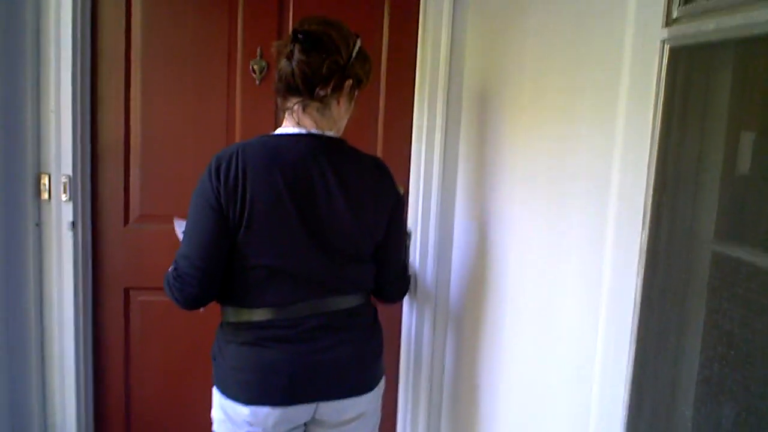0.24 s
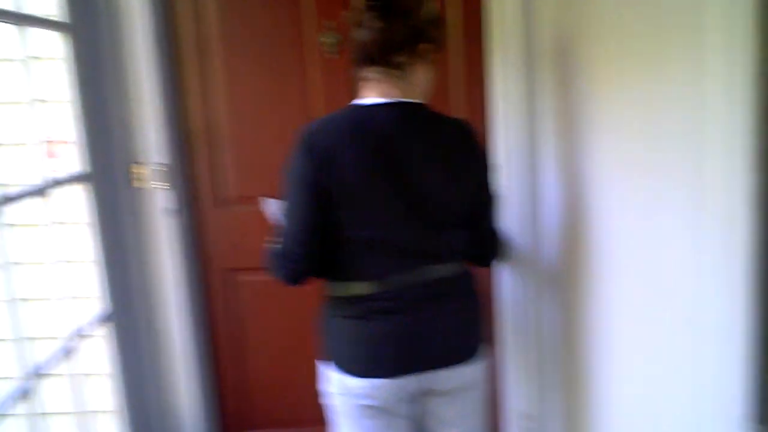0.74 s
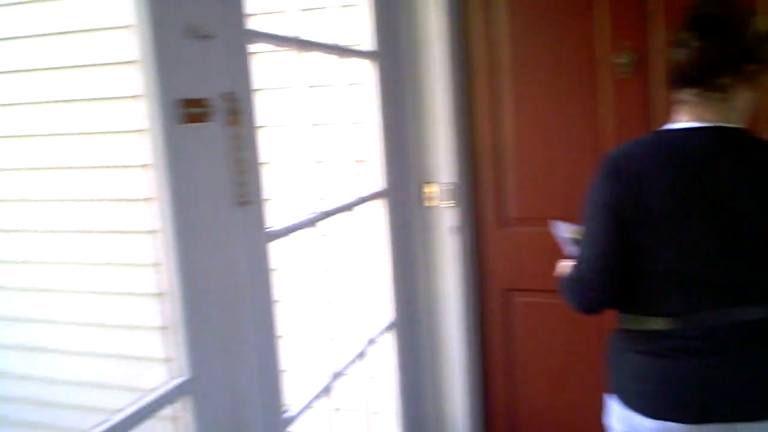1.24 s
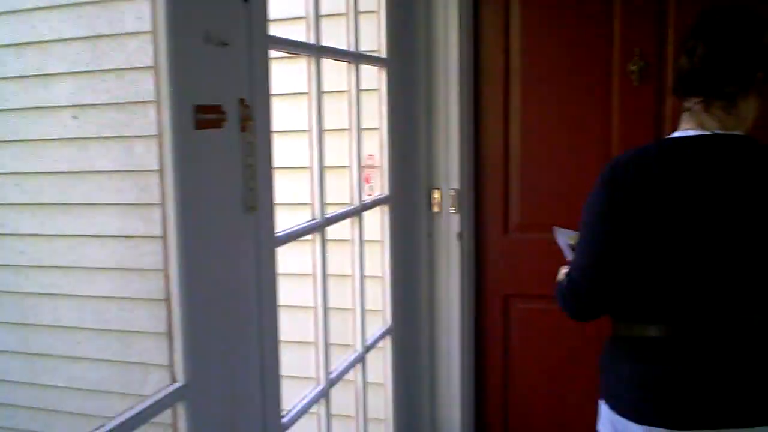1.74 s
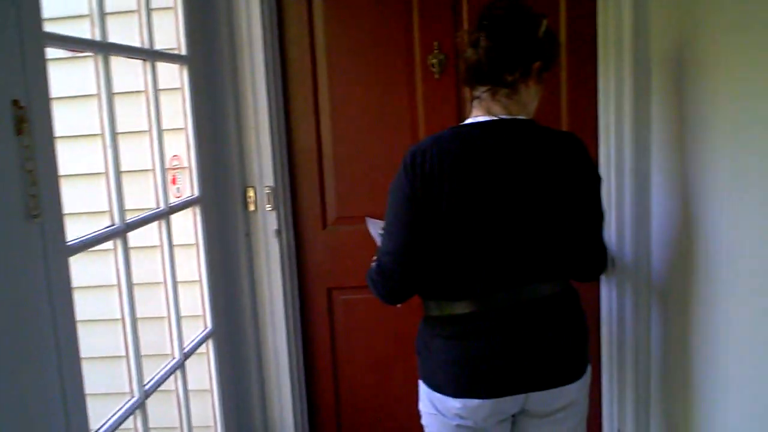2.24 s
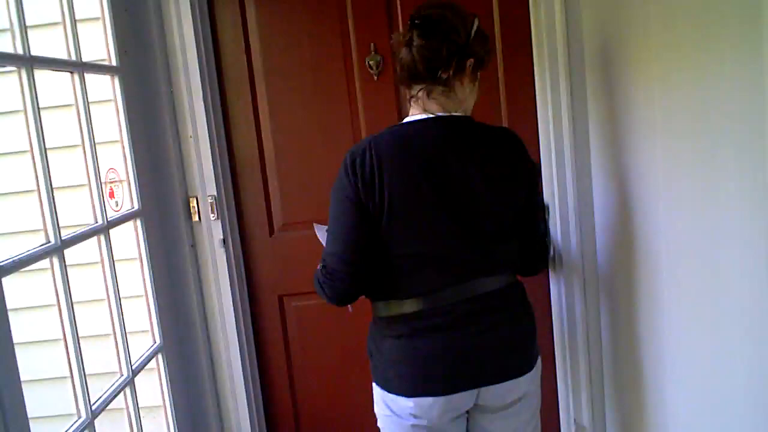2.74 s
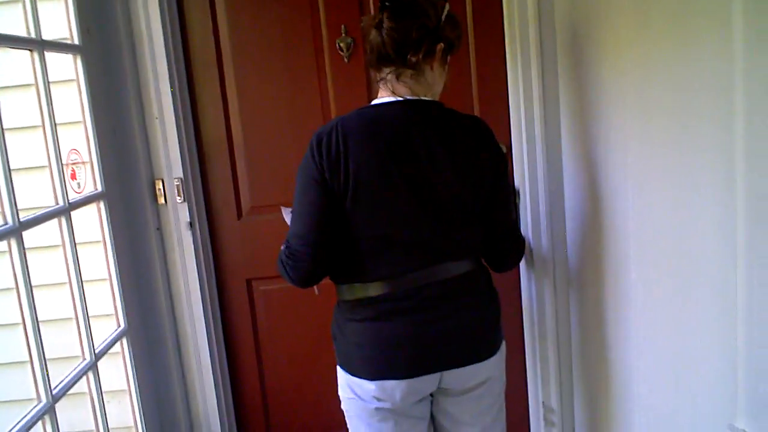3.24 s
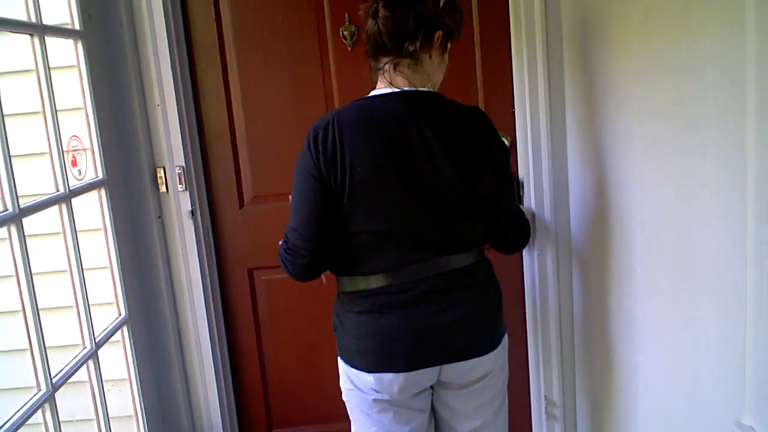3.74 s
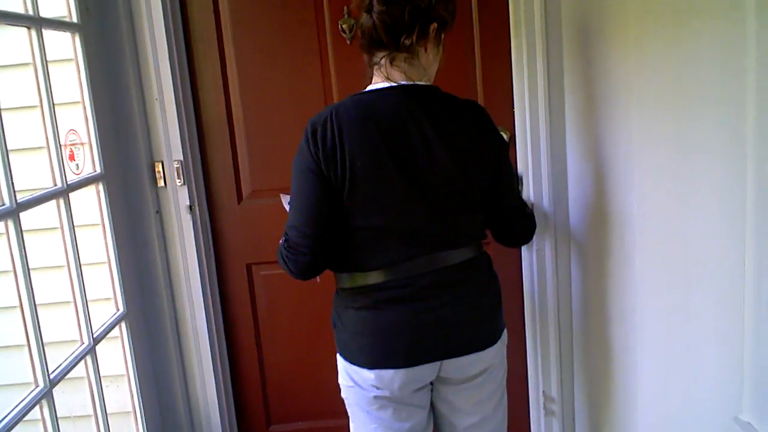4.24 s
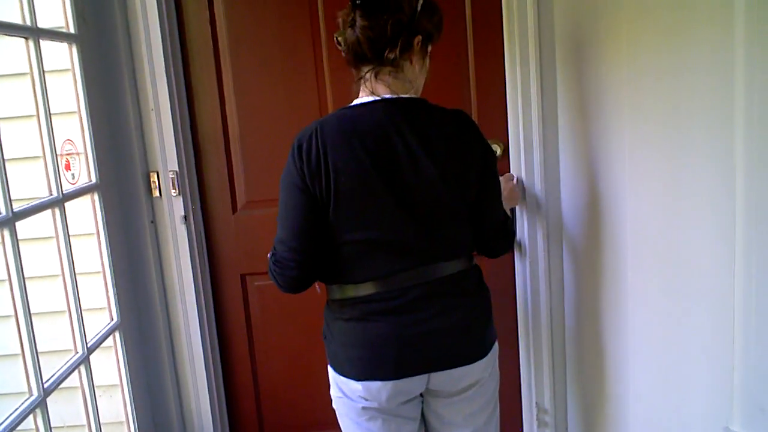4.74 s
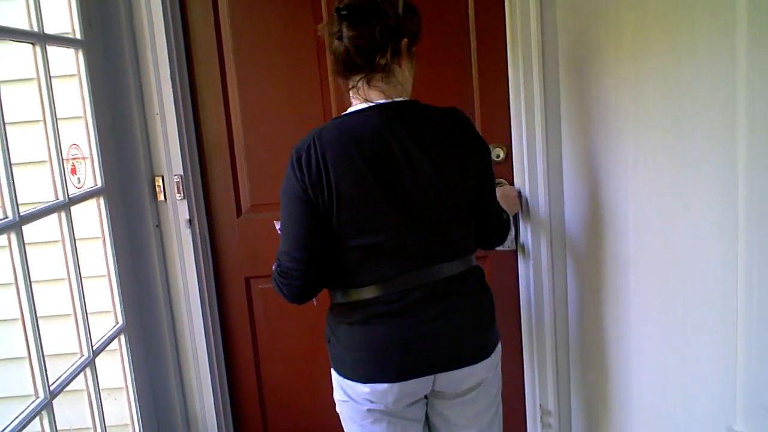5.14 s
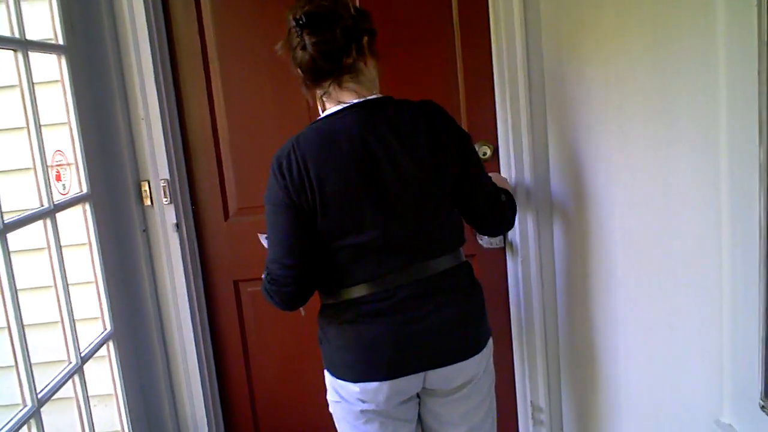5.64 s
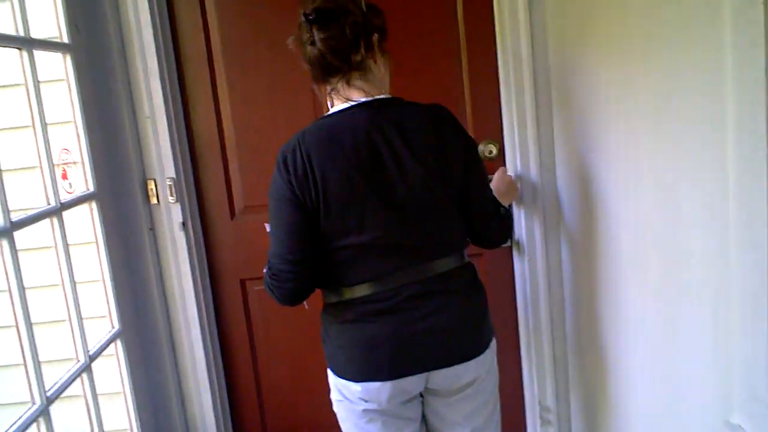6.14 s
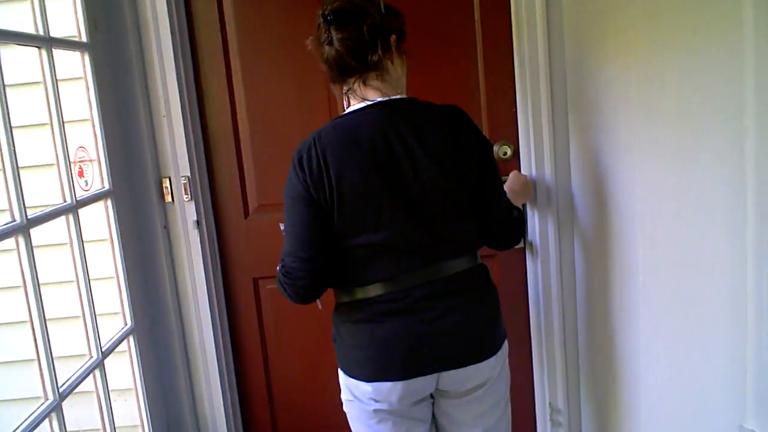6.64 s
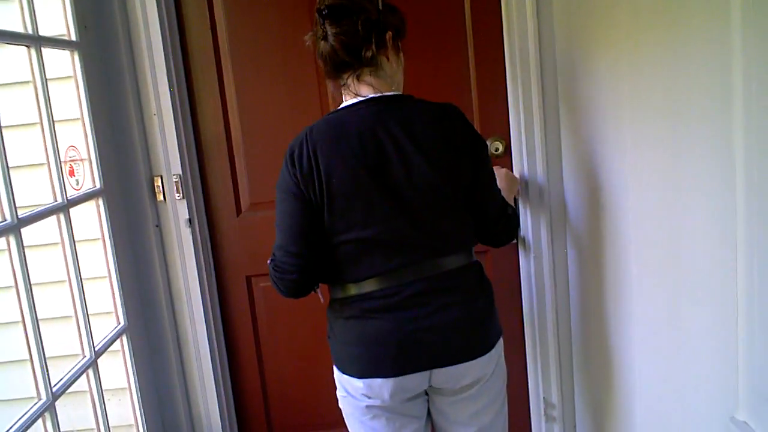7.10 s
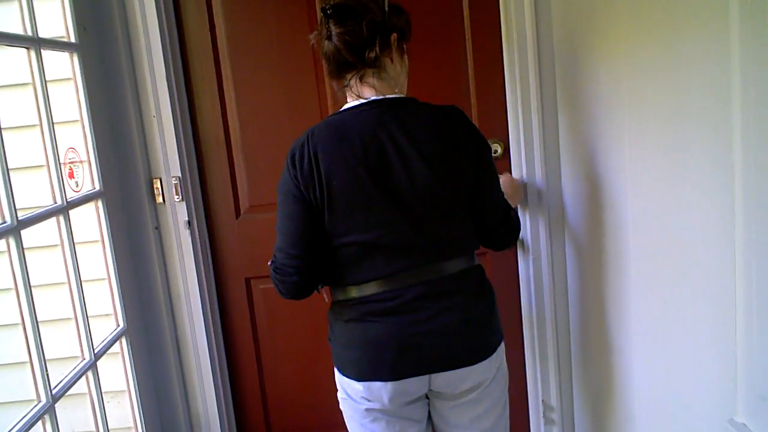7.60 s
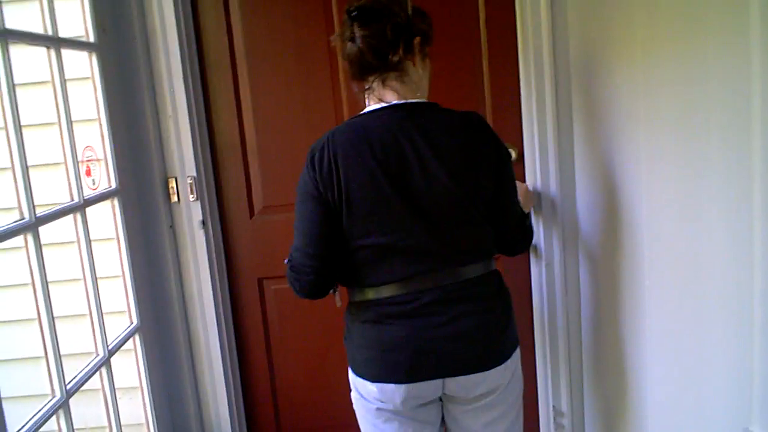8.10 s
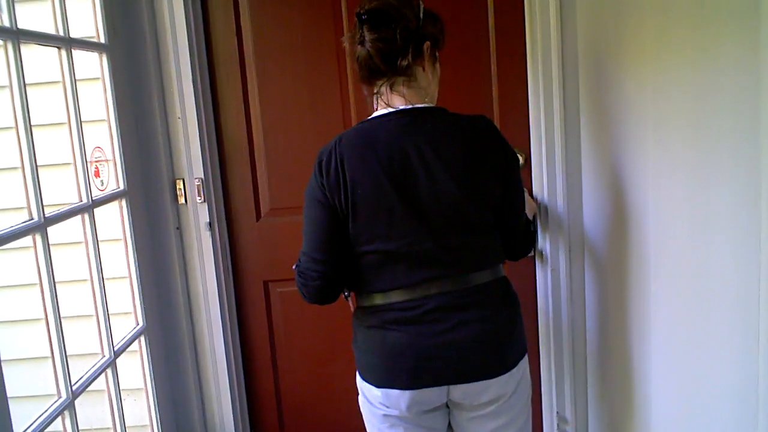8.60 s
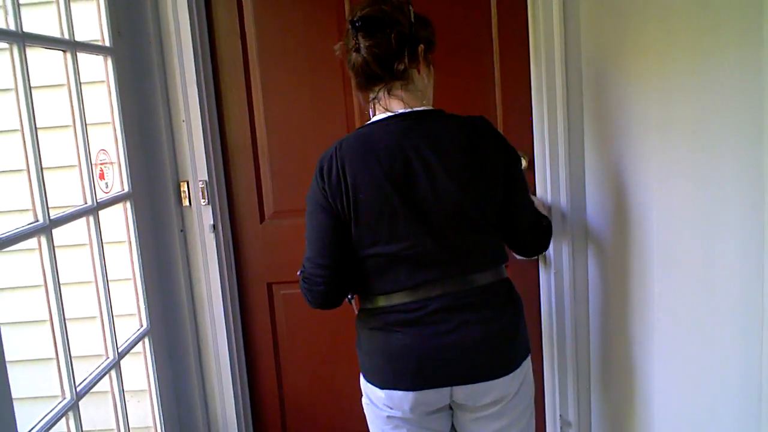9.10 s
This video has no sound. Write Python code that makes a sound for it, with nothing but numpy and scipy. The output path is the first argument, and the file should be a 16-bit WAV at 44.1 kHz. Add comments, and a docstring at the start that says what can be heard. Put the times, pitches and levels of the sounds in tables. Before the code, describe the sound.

Paper crinkles and keys jingle at a house door, a storm door latches with a sharp double knock, then a key clicks into a lock and the knob rattles.

```python
"""At a house door in a small hard-walled entry: paper crinkles, keys jingle and shoes shift under faint outdoor air.
A storm door hisses on its closer, paper swishes, the door squeaks and latches with a sharp double knock.
A key taps the lock face, scrapes past the pins and seats; the knob is turned, the door bumps and hanging keys tinkle.
Blows are noise clicks, rubbing is noise under a level curve; each is filtered by its object, then by the entry."""
import sys
import numpy as np
from scipy import signal
from scipy.fft import rfft, irfft
from scipy.io import wavfile
from scipy.ndimage import uniform_filter1d

SR = 44100
rng = np.random.default_rng(int(sys.argv[2]) if len(sys.argv) > 2 else 0)


def wrap_up_sound(samples):
    """Save the sound to the file named by the first command line argument, as 16-bit audio."""
    columns = np.atleast_2d(samples).T
    # keep every value between -1 and 1, then stretch to whole-number steps
    tamed = np.clip(columns, -1, 1)
    steps = np.round(tamed * 32767).astype(np.int16)
    wavfile.write(sys.argv[1], SR, steps)


N = 412776
TIME_S = np.arange(N) / SR
FFT_SIZE = 32768
BINS_HZ = np.maximum(np.arange(FFT_SIZE // 2 + 1) * SR / FFT_SIZE, 1)

# Event and curve levels are before layer and body gains; colour and mode levels are relative.
# outdoor air colour: f/Hz, level/dB
AIR_COLOUR = [(15, -62), (25, -31.5), (123, -25.5), (277, -13), (309, -14.5), (373, -9), (439, -12),
              (887, -10.5), (962, -11.5), (1610, -14.5), (5570, -21.5), (6380, -22), (9840, -29.5),
              (14400, -34.5), (16000, -33)]
AIR_LEVEL_DB = -68.5
# paper crinkles: t/s, crease level/dB, treble snap level/dB
CRINKLES = [(0.049, -53, -62), (0.173, -52, -56), (0.2517, -49.5, -52), (0.293, -52, -53),
            (0.4589, -54.5, -61.5), (0.535, -51.5, -58), (0.589, -47, -49.5), (0.6818, -46.5, -53),
            (0.766, -48, -55.5), (0.995, -42, -55), (1.014, -44.5, -48.5), (1.335, -53.5, -50),
            (1.817, -50, -70)]
# sheet colour: f/Hz, level/dB
PAPER_COLOUR = [(150, -24), (250, -12), (329, -13), (609, -7), (723, -4.5), (1020, -3), (2060, -1),
                (3210, -1), (5190, -10.5), (5950, -7), (11200, -22), (12400, -53), (15000, -46)]
# sheet modes: f/Hz, width/Hz, level/dB
PAPER_MODES = [(1720, 250, -11), (2130, 230, -2), (3150, 300, -2.5)]
CRINKLE_LENGTH_S, CREASES_PER_S = 0.021, 600   # length at the mean level
HALVING_DB = 6.5   # a touch this much harder is over in half the time
# key ring jingles in the hand: t/s, level/dB
JINGLES = [(0.2628, -49), (1.305, -58), (2.2832, -53)]
# carried keys stir faintly, level curve: t/s, level/dB
STIR = [(1.55, -59.5), (2.2, -66.5)]
STIRS_PER_S = 9
# key ring modes: f/Hz, width/Hz, level/dB
RING_MODES = [(3260, 290, -2), (6600, 110, -5.5), (7130, 31, 3.5), (8100, 59, -3), (9700, 70, -6),
              (11140, 240, -8.5)]
# footfalls: t/s, heel level/dB, heel low-pass corner f/Hz, delay of sole/s
STEPS = [(0.678, -53, 1200, 0.1), (1.181, -39, 1220, 0.049), (3.338, -57, 1800, .03),
         (3.509, -44, 380, .014), (3.767, -52.5, 220, .063)]
SOLE_DB, SOLE_CORNER_RATIO = 2.0, 2.04   # against the heel
WEIGHT_DELAY_S, WEIGHT_DB = .02, 0.5   # after the sole; level against the heel
# floorboard colour: f/Hz, level/dB
BOARDS_COLOUR = [(60, -25), (110, -30), (170, -3.5), (260, -3), (340, -1.5), (470, -10), (590, -4.5),
                 (720, -11.5), (1200, -15), (1500, -25), (3000, -10.5), (7000, -20)]
# door closer hiss, level curve: t/s, level/dB
CLOSER = [(1.5, -74), (1.75, -72), (1.9, -66.5), (2.03, -68), (2.2, -71), (2.3, -90)]
# hiss colour: f/Hz, level/dB
CLOSER_COLOUR = [(1500, 3.5), (3500, -3), (6000, 1), (8500, -3), (10500, -15), (15000, -21)]
# papery swish, level curve: t/s, level/dB
SWISH = [(2.22, -70), (2.29, -56), (2.318, -41.5), (2.335, -51), (2.36, -65.5), (2.40, -84)]
# swish colour: f/Hz, level/dB
SWISH_COLOUR = [(350, -39), (600, -17.5), (927, -19), (1430, -19.5), (1580, -2), (1960, -9), (2100, -8),
                (3070, -2), (3870, -9), (6580, -8.5), (8750, -14.5), (11200, -17), (15500, -30)]
# storm door squeaks at its seal and as it settles: t/s, f/Hz, level/dB, half length/s
SQUEAKS = [(2.731, 650, -43.5, 0.0063), (2.995, 1690, -54, .008), (3.019, 1675, -45.5, 0.004)]
# storm door latching: t/s, frame level/dB, latch level/dB, strike plate level/dB
KNOCKS = [(2.7347, -49, -48, -55), (2.755, -44, -18.5, -55), (2.7594, -28, -32, -59),
          (2.8598, -46, -25.5, -66), (2.866, -34.5, -64, -38.5)]
# storm door frame colour: f/Hz, level/dB
FRAME_COLOUR = [(40, -32), (120, -45), (250, -15), (450, -21.5), (620, -28), (780, 4), (1050, -19),
                (1500, -6), (1850, -26), (3000, -20), (8000, -60)]
# storm door frame modes: f/Hz, width/Hz, level/dB
FRAME_MODES = [(267, 7, -4), (700, 17, 3), (770, 41, -2), (800, 34, 6), (898, 22, 4), (1476, 19, -1),
               (1550, 37, -15)]
# latch colour: f/Hz, level/dB
LATCH_COLOUR = [(300, -19), (1500, -9), (2600, -3.5), (3300, 3), (4300, 1), (6000, 6), (8500, 3),
                (10000, -7.5), (13000, -15), (16000, -28)]
# latch modes: f/Hz, width/Hz, level/dB
LATCH_MODES = [(3340, 48, 13.5), (3600, 50, 1), (3800, 160, 12), (4870, 150, 7), (5470, 42, -13),
               (6350, 200, -12), (7260, 81, -17), (7930, 71, -6)]
# strike plate modes: f/Hz, width/Hz, level/dB
PLATE_MODES = [(1130, 48, 8), (1250, 35, -13.5)]
# hanging keys touch: t/s, level/dB, favoured f/Hz
TINKS = [(3.531, -58, 4900), (3.6513, -58.5, 5500), (4.6555, -62.5, 7000), (5.9777, -64.5, 8450),
         (6.25, -69, 5700), (6.345, -59, 5770), (7.7469, -52.5, 6700), (8.5755, -60.5, 7900),
         (8.6135, -52, 7900), (9.175, -48.5, 2700)]
# hanging key modes: f/Hz, width/Hz, level/dB
TINK_MODES = [(2560, 94, 1.5), (4520, 320, 3), (4560, 33, 9), (6630, 300, 10.5), (7180, 430, -10),
              (7300, 45, -4), (7760, 170, 7.5), (9100, 600, -5), (10500, 230, -17)]
# key tip meets lock face: t/s, level/dB
TAPS = [(3.8548, -34.5)]
# lock face colour: f/Hz, level/dB
FACE_COLOUR = [(350, -58), (600, -37), (716, -23), (1360, -18.5), (2220, -26), (2750, -15), (3290, -4.5),
               (6060, -8.5), (7140, 0.5), (9120, -18), (15500, -43)]
# lock face modes: f/Hz, width/Hz, level/dB
FACE_MODES = [(2770, 120, -0.5), (3270, 160, -1), (4260, 200, 5), (4970, 110, -4), (7000, 82, -2),
              (7050, 100, -7)]
# whole door leaf colour: f/Hz, level/dB
LEAF_COLOUR = [(30, -30), (100, -36), (150, -6), (260, -2.5), (380, -17), (520, -12), (900, -29)]
# whole door leaf modes: f/Hz, width/Hz, level/dB
LEAF_MODES = [(63.6, 9.8, -18.5), (180, 20, -7), (360, 56, 5.5)]
# lock springs snap: t/s, level/dB
SNAPS = [(4.011, -43.5), (4.948, -46), (7.6442, -42.5), (8.4083, -44), (9.213, -54)]
# bolt modes: f/Hz, width/Hz, level/dB
BOLT_MODES = [(3370, 140, -1), (3870, 170, -1.5), (4700, 270, -9), (5120, 120, -2.5), (6420, 86, -7),
              (7390, 25, 1), (10600, 74, -28)]
# key catches at the lock mouth, seats, is jolted again: t/s, key ring level/dB, wood level/dB
CATCHES = [(4.012, -56, -45.5), (4.095, -60, -40), (4.298, -40, -62), (4.367, -30, -44),
           (9.212, -41.5, -60)]
# blade scrapes along the keyway, level curve: t/s, level/dB
SCRAPE = [(4.05, -91), (4.28, -85), (4.355, -78)]
FIRST_PIN_S, PIN_GAP_S, PIN_GAP_RATIO = 4.127, .072, .92   # each gap against the one before
FIRST_PIN_DB, PIN_RISE_DB = -42, 2.0   # rise per pin
# keyway colour: f/Hz, level/dB
KEYWAY_COLOUR = [(1500, -11.5), (2600, -15.5), (3600, -9.5), (5300, -11), (7800, -8), (9500, -18),
                 (12000, -28), (15500, -39)]
# key's low mode: f/Hz, width/Hz, level/dB
KEY_LOW_MODES = [(2580, 100, 6.5)]
# key's high modes: f/Hz, width/Hz, level/dB
KEY_HIGH_MODES = [(4284, 77, 6), (4630, 71, -1), (3800, 130, -6)]
# colour of the wood around the lock: f/Hz, level/dB
STILE_COLOUR = [(200, -9), (500, -6.5), (850, 4), (1200, 4.5), (1900, -5), (3000, -4.5), (5000, -37)]
# knob spindle takes up the play: t/s, level/dB, length/s
CLACKS = [(4.951, -50.5, 0.0055), (5.073, -44, .0037), (5.404, -53, .01), (5.846, -61, 0.013),
          (6.492, -58, .008), (7.079, -55.5, 0.013), (7.131, -55, 0.0094), (7.377, -48, 0.0037),
          (7.644, -45, 0.015), (7.869, -54, .011), (7.896, -49.5, .01), (8.067, -46, 0.0087),
          (8.216, -42, 0.0076), (8.41, -47.5, 0.035), (8.556, -48, 0.048), (8.903, -48.5, 0.025),
          (8.92, -41, .0065), (8.986, -45, 0.018), (9.263, -48, 0.0098)]
# door bumps in its frame: t/s, level/dB
BUMPS = [(5.155, -39.5), (5.369, -46), (5.407, -42.5), (6.582, -51), (6.767, -33.5), (6.999, -48.5),
         (7.257, -41.5), (7.378, -32.5), (7.456, -41), (7.502, -39), (7.938, -43), (8.081, -31),
         (8.191, -33.5), (8.222, -31.5), (9.322, -40)]
BUMP_LENGTH_S, THUD_DB_PER_BUMP_DB = 0.0086, 1.3   # length at the mean level
PULL_S, PULL_DB, PULL_LENGTH_S = 8.215, -40.5, 0.028   # hardest pull: the leaf hits its stop
# knob works rub and rattle, level curve: t/s, level/dB
RUB = [(6.9, -69), (7.51, -56.5), (7.72, -65.5), (7.94, -64.5), (8.25, -59), (8.52, -58), (8.68, -72),
       (8.95, -68), (9.12, -60), (9.36, -59)]
RATTLES_PER_S = 12
# door panel colour: f/Hz, level/dB
DOOR_COLOUR = [(45, -28), (100, -40), (180, -17.5), (330, -4), (460, -8.5), (690, 0.5), (1000, -4),
               (1300, -5), (1750, -11), (2200, -11), (2900, -23), (4200, -36)]
# door panel modes: f/Hz, width/Hz, level/dB
DOOR_MODES = [(727, 55, 4.5), (840, 87, 1), (1040, 83, -4), (2130, 140, -7)]
# spindle colour: f/Hz, level/dB
SPINDLE_COLOUR = [(1200, -43), (2200, -2), (3500, 5.5), (5200, 4.5), (7500, -3.5), (10000, -11.5),
                  (15500, -35.5)]
# entry ring time: f/Hz, t60/s
ENTRY_T60 = [(100, 0.45), (300, 0.62), (800, 0.43), (2000, 0.26), (5000, 0.22), (12000, 0.19)]
CUTOFF_HZ = 15900


def from_db(db):
    """Decibels to gain."""
    return 10 ** (np.asarray(db) / 20)


def unit_energy(x):
    """Scale so that the squares sum to one."""
    return x / np.sqrt(np.sum(x ** 2) + 1e-20)


def at_hz(points, hz):
    """Read a table on a log-frequency axis."""
    f, value = np.transpose(points)
    return np.interp(np.log(hz), np.log(f), value)


def through(x, response):
    """Pass a sound through an impulse response."""
    return signal.fftconvolve(x, response)[:N]


def filtered(x, hz, kind="low"):
    """Second-order Butterworth filter."""
    return signal.sosfilt(signal.butter(2, hz, kind, fs=SR, output="sos"), x)


def evened(x, size=120):
    """Many-path response: keep the fine spectral ripple, level the broad bands."""
    spectrum = rfft(x, FFT_SIZE)
    broad = np.sqrt(np.abs(uniform_filter1d(np.abs(spectrum) ** 2, size=size)))
    levelled = irfft(spectrum / (broad + broad.mean() / 10))
    return unit_energy(levelled[:FFT_SIZE - FFT_SIZE // 16])


def body(colour=None, modes=(), colour_db=0):
    """Causal response of an object: broad colour from crowded modes, plus single ringing modes."""
    power = np.full(len(BINS_HZ), 1e-9)
    if colour is not None:
        beyond = np.minimum(BINS_HZ / colour[0][0], 1) * np.minimum(colour[-1][0] / BINS_HZ, 1)
        gain = from_db(at_hz(colour, BINS_HZ) + colour_db) * beyond ** 2
        power = power + gain ** 2
    for hz, width_hz, db in modes:
        detuning = (BINS_HZ ** 2 - hz ** 2) / (BINS_HZ * width_hz)
        power = power + from_db(db) ** 2 / (1 + detuning ** 2)
    cepstrum = irfft(np.log(power))[:FFT_SIZE // 2]   # minimum phase: nothing sounds before the blow
    cepstrum[0] /= 2
    response = irfft(np.exp(rfft(cepstrum, FFT_SIZE)))
    return unit_energy(response[:FFT_SIZE // 2])


def contacts(times_s, levels_db, length_s, chatter, per_s=1760):
    """Each touch: one click and a scatter of tiny rebounds; 'chatter' is the rebounds' energy share."""
    out, t = np.zeros(N + FFT_SIZE), TIME_S[:FFT_SIZE // 4]
    share = np.clip(chatter, 0, 1)
    for s, db, length in zip(times_s, levels_db, np.broadcast_to(length_s, len(times_s))):
        age = t / max(length, 1e-3)
        rebounds = rng.standard_normal(len(t)) * (rng.random(len(t)) < per_s / SR)
        touch = np.sqrt(share) * unit_energy(rebounds * np.exp(-age))
        touch[0] += np.sqrt(1 - share)
        touch = evened(touch, size=32)
        start = max(round(s * SR), 0)
        out[start:start + len(touch)] += from_db(db) * touch
    return out[:N]


def touch_length_s(db, mean_s):
    """Light touches chatter on; hard ones are over quickly."""
    return mean_s * 2 ** ((db.mean() - db) / HALVING_DB)


def loose_touches(curve, per_s, length_s):
    """Loose parts touch at uneven moments and strengths, under a level curve."""
    s, db = np.transpose(curve)
    chance = rng.random((64, 2))
    times_s = s[0] + (np.arange(len(chance)) + chance[:, 0]) / per_s
    levels_db = np.interp(times_s, s, db) + 4 * (2 * chance[:, 1] - 1)   # +-4 dB
    held = times_s < s[-1]
    return times_s[held], levels_db[held], length_s


def friction(curve, grain_db):
    """Dense slips of uneven size under a level curve."""
    s, db = np.transpose(curve)
    grain = np.repeat(rng.standard_normal(N // 64 + 1), 64)[:N]
    slips = rng.standard_normal(N) * from_db(grain_db * grain)
    return slips / slips.std() * from_db(np.interp(TIME_S, s, db, left=-140, right=-140))


def outdoor_air():
    """Faint steady air: coloured noise."""
    return from_db(AIR_LEVEL_DB) * through(rng.standard_normal(N), body(AIR_COLOUR))


def paper_crinkles(crease_db=24, snap_db=24):
    """Creases snap with a shower of smaller ones; harder are shorter, sharper add treble."""
    s, crease_hit, snap_hit = np.transpose(CRINKLES)
    length = touch_length_s(crease_hit, CRINKLE_LENGTH_S)
    sheet = body(PAPER_COLOUR, PAPER_MODES)
    sharp = unit_energy(filtered(sheet, 5500, "high"))
    soft = unit_energy(filtered(sheet, 4800))
    creases = contacts(s, crease_hit, length, chatter=0.72, per_s=CREASES_PER_S)
    snaps = contacts(s, snap_hit, length, chatter=1.0, per_s=CREASES_PER_S)
    return from_db(crease_db) * through(creases, soft) + from_db(snap_db) * through(snaps, sharp)


def key_jingle(jingle_db=25):
    """Loose keys strike each other in the hand and excite the ring modes."""
    s, db = np.transpose(JINGLES)
    shakes = contacts(s, db, 0.0087, chatter=0.95)
    stirs = contacts(*loose_touches(STIR, STIRS_PER_S, length_s=.008), chatter=1.0)
    return from_db(jingle_db) * through(shakes + stirs, body(modes=RING_MODES))


def footsteps(level_db=21):
    """Heel, sole, then whole weight strike the boards; a lower corner makes a duller tread."""
    out = 0
    for s, db, corner_hz, roll_s in STEPS:
        heel = (s, db, corner_hz)
        sole = (s + roll_s, db + SOLE_DB, corner_hz * SOLE_CORNER_RATIO)
        weight = (s + roll_s + WEIGHT_DELAY_S, db + WEIGHT_DB, corner_hz)
        for at_s, hit_db, hz in heel, sole, weight:
            out = out + filtered(contacts([at_s], [hit_db], 0.0032, chatter=0.29), min(hz, SR / 4))
    return from_db(level_db) * through(out, body(BOARDS_COLOUR))


def closer_hiss():
    """The storm door's closer hisses: noise under a level curve."""
    return through(friction(CLOSER, grain_db=1), body(CLOSER_COLOUR))


def paper_swish():
    """Paper rubs briefly: uneven slips through a papery colour."""
    return through(friction(SWISH, grain_db=6.0), body(SWISH_COLOUR))


def squeak(s, hz, db, half_length_s):
    """A short stick-slip tone that swells and fades."""
    swell = np.exp(-((TIME_S - s) / half_length_s) ** 2)
    return from_db(db) * swell * np.sin(2 * np.pi * hz * TIME_S)


def storm_door(frame_db=28, latch_db=22, plate_db=28):
    """The latch strikes, the frame follows, both rebound once; the door squeaks before and after."""
    s, frame_hit, latch_hit, plate_hit = np.transpose(KNOCKS)
    frame = through(contacts(s, frame_hit, 0.016, chatter=0.051), body(FRAME_COLOUR, FRAME_MODES))
    latch = through(contacts(s, latch_hit, .002, chatter=.65), body(LATCH_COLOUR, LATCH_MODES))
    plate = through(contacts(s, plate_hit, 0.0017, chatter=.05), body(modes=PLATE_MODES))
    knocks = from_db(frame_db) * frame + from_db(latch_db) * latch + from_db(plate_db) * plate
    return knocks + sum(squeak(*row) for row in SQUEAKS)


def key_tinks(tink_db=27, focus_octaves=0.26, max_cut_db=7.5):
    """Hanging keys touch; the place of contact decides which modes speak loudest."""
    out = 0
    for s, db, favoured_hz in TINKS:
        modes = []
        for hz, width_hz, level_db in TINK_MODES:
            cut_db = min(6 * (np.log2(hz / favoured_hz) / focus_octaves) ** 2, max_cut_db)
            modes.append((hz, width_hz, level_db - cut_db))
        out = out + through(contacts([s], [db], 0.0018, chatter=0.14), body(modes=modes))
    return from_db(tink_db) * out


def key_tap(face_db=26, thud_db=0):
    """The key tip strikes the lock face and stirs the door leaf."""
    s, db = np.transpose(TAPS)
    touch = contacts(s, db, 0.015, chatter=0.2)
    face = through(touch, body(FACE_COLOUR, FACE_MODES, colour_db=2.0))
    thud = through(touch, body(LEAF_COLOUR, LEAF_MODES))
    return from_db(face_db) * face + from_db(thud_db) * thud


def lock_springs(bolt_db=23):
    """Springs snap in the lock and ring the bolt."""
    s, db = np.transpose(SNAPS)
    return from_db(bolt_db) * through(contacts(s, db, 0.016, chatter=0.18), body(modes=BOLT_MODES))


def pin_clicks(count=4):
    """Each pin clicks louder than the one before, at shrinking gaps."""
    k = np.arange(count)
    times_s = FIRST_PIN_S + PIN_GAP_S * (1 - PIN_GAP_RATIO ** k) / (1 - PIN_GAP_RATIO)
    return contacts(times_s, FIRST_PIN_DB + PIN_RISE_DB * k, 0.0048, chatter=0.38)


def key_in_lock(keyway_db=19, low_db=19, high_db=19, wood_db=18):
    """Catches, pins and scraping drive the keyway, the key's own modes and the wood around the lock."""
    s, ring_hit, wood_hit = np.transpose(CATCHES)
    catches = contacts(s, ring_hit, .0025, chatter=0.066)
    knocks = contacts(s, wood_hit, 0.0063, chatter=0.98)
    pins, scrape = pin_clicks(), friction(SCRAPE, grain_db=8.5)
    keyway = through(pins + scrape + from_db(-6.0) * catches, body(KEYWAY_COLOUR))
    low = through(from_db(2.5) * scrape + from_db(-13) * pins, body(modes=KEY_LOW_MODES))
    high = through(catches + from_db(-3.5) * scrape, body(modes=KEY_HIGH_MODES))
    wood = through(knocks + from_db(-3) * scrape + from_db(-12) * pins, body(STILE_COLOUR))
    ringing = from_db(low_db) * low + from_db(high_db) * high
    return from_db(keyway_db) * keyway + ringing + from_db(wood_db) * wood


def knob(bump_db=20, bump_click_db=2.0, thud_db=2.0, clack_db=22, clack_panel_db=27,
         rattle_db=31, rattle_click_db=23.0, rub_db=-6, pull_db=24):
    """Bright spindle clacks stir the panels; dull bumps move the leaf and shake the spindle a little."""
    clacks = contacts(*np.transpose(CLACKS), chatter=0.79, per_s=700)
    s, db = np.transpose(BUMPS)
    bumps = contacts(s, db, touch_length_s(db, BUMP_LENGTH_S), chatter=0.76, per_s=800)
    thud_hit = db.mean() + THUD_DB_PER_BUMP_DB * (db - db.mean())
    thuds = contacts(s, thud_hit, .0067, chatter=0.099)
    pull = contacts([PULL_S], [PULL_DB], PULL_LENGTH_S, chatter=0.44)
    rubbing = from_db(rub_db) * friction(RUB, grain_db=7.5)
    rattles = contacts(*loose_touches(RUB, RATTLES_PER_S, length_s=.011), chatter=0.67)

    blows = from_db(bump_db) * bumps + from_db(clack_panel_db) * clacks + from_db(rattle_db) * rattles
    panels = through(blows + rubbing, body(DOOR_COLOUR, DOOR_MODES, colour_db=13.0))
    clicks = from_db(clack_db) * clacks + from_db(bump_click_db) * bumps
    spindle = through(clicks + from_db(rattle_click_db) * rattles, body(SPINDLE_COLOUR))
    leaf = through(from_db(thud_db) * thuds + from_db(pull_db) * pull, body(LEAF_COLOUR, LEAF_MODES))
    return panels + spindle + leaf


def entry(late_db, late_stretch=1.72):
    """Dense reflections build at a 1.5 ms time constant and die band by band, with a weak longer tail."""
    t, edges_hz = TIME_S[:FFT_SIZE], np.geomspace(45, 18000, 13)
    white, tail = rng.standard_normal((2, FFT_SIZE)), 0
    for k, (low, high) in enumerate(zip(edges_hz, edges_hz[1:])):
        band = filtered(white[k % 2], [low, high], "band")
        fall_db = -60 * t / at_hz(ENTRY_T60, np.sqrt(low * high))
        tail = tail + band * np.hypot(from_db(fall_db), from_db(late_db + fall_db / late_stretch))
    return evened(tail * (1 - np.exp(-t / .0015)))


def in_entry(x, direct_db, late_db, sway_hz=0.3527):
    """The hand-held microphone drifts: one pattern of reflections slowly gives way to another."""
    turn = 2 * np.pi * sway_hz * TIME_S
    reflections = through(x * np.cos(turn), entry(late_db)) + through(x * np.sin(turn), entry(late_db))
    return (reflections + from_db(direct_db) * x) / np.hypot(1, from_db(direct_db))


def scene():
    """The person's back shields the knob; metal has the strongest late tail, the storm door is most direct."""
    air = outdoor_air()
    handling = paper_crinkles() + footsteps() + paper_swish() + knob()
    small_metal = key_jingle() + key_tinks() + key_tap() + lock_springs() + key_in_lock()
    shielded = in_entry(handling, direct_db=-8.0, late_db=-15.0)
    metal = in_entry(small_metal, direct_db=-8, late_db=-10)
    closing = in_entry(closer_hiss() + storm_door(), direct_db=-3.5, late_db=-17.0)
    return (air + shielded + metal + closing)[None]


def record(dry):
    """Steep elliptic low-pass: 0.1 dB ripple, 70 dB stop band."""
    return signal.sosfilt(signal.ellip(10, .1, 70, CUTOFF_HZ, fs=SR, output="sos"), dry)


dry = scene()
out = record(dry)
wrap_up_sound(out)
```